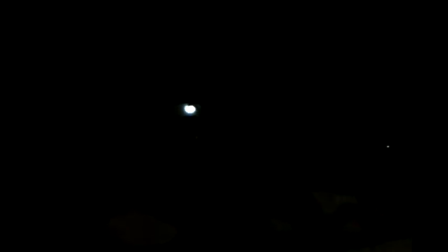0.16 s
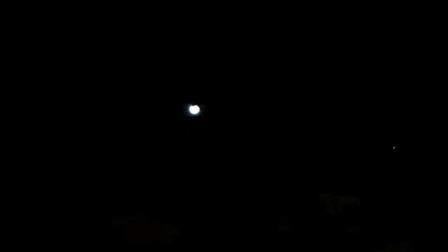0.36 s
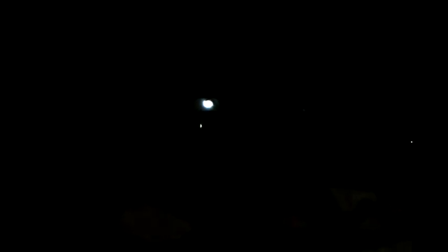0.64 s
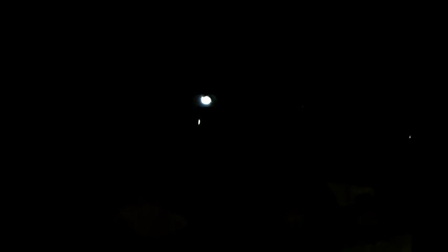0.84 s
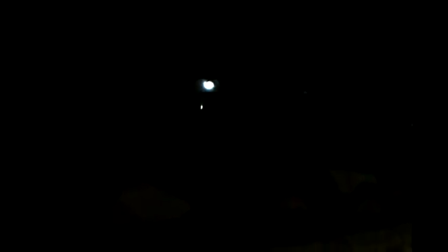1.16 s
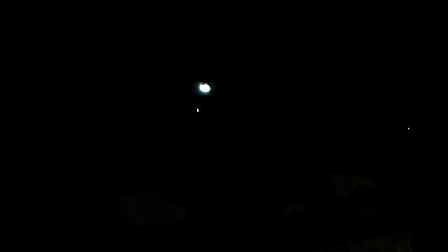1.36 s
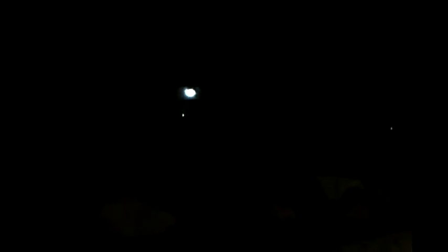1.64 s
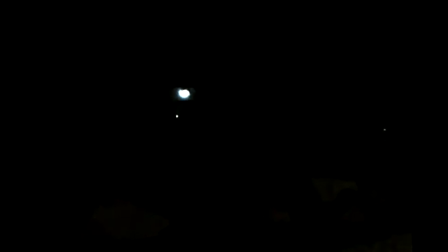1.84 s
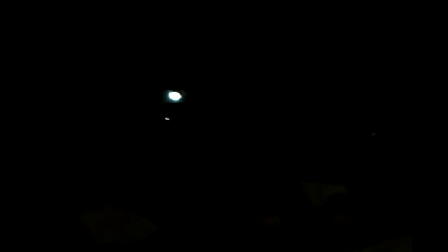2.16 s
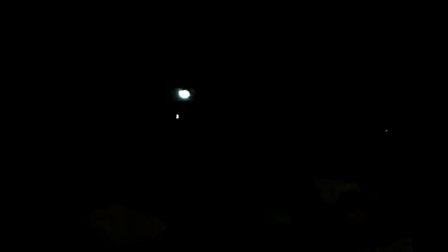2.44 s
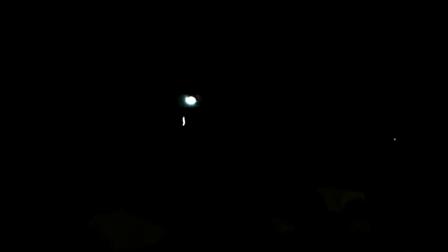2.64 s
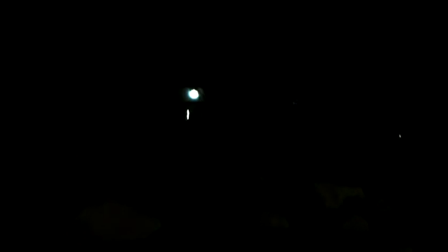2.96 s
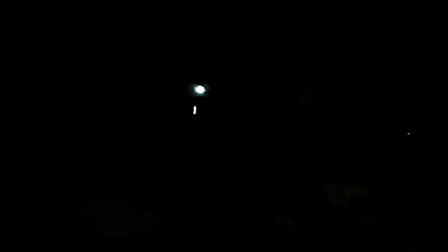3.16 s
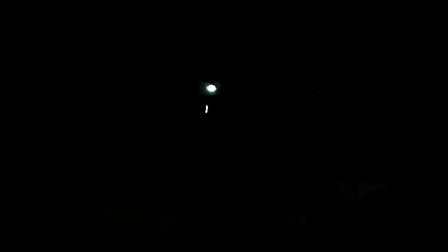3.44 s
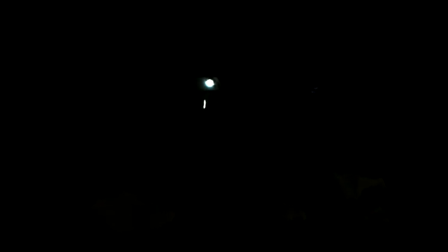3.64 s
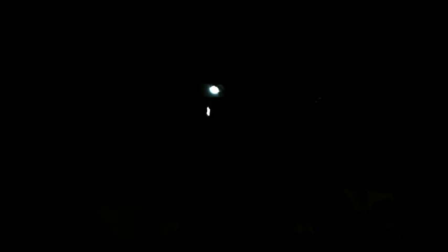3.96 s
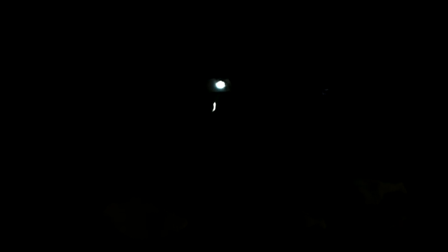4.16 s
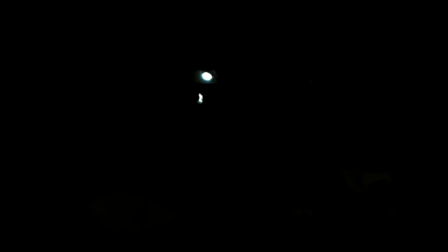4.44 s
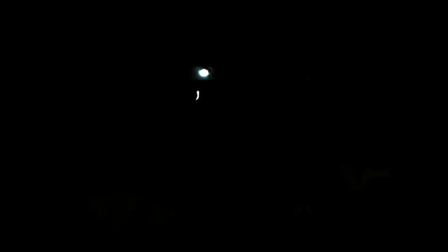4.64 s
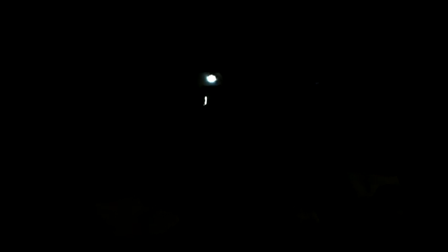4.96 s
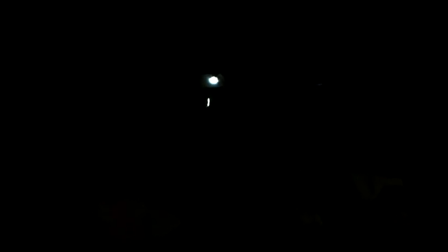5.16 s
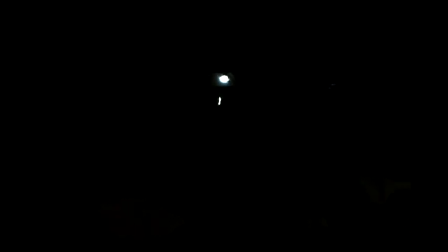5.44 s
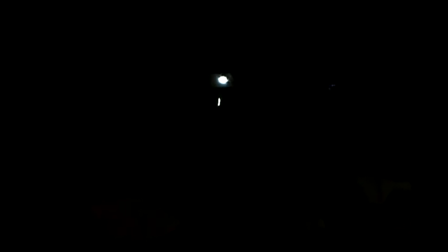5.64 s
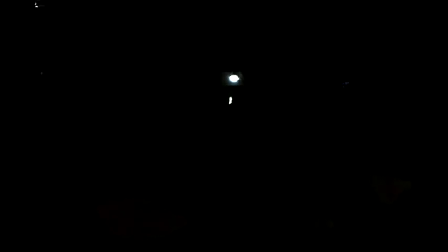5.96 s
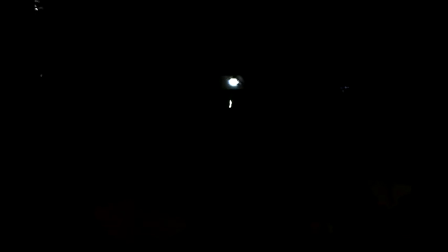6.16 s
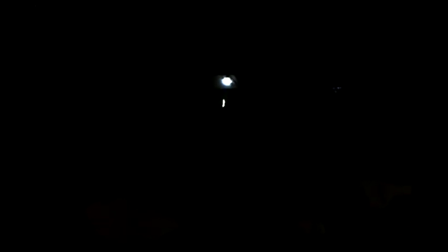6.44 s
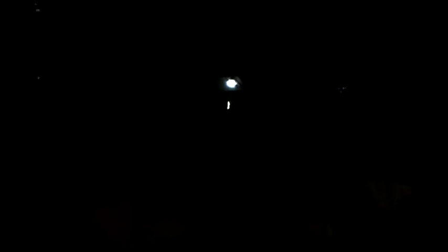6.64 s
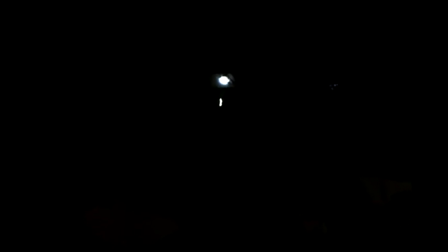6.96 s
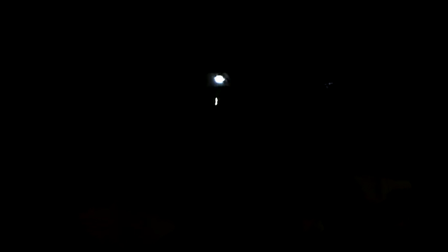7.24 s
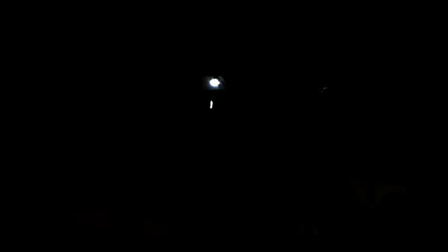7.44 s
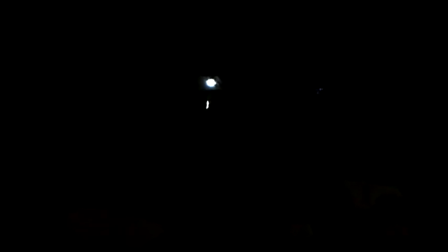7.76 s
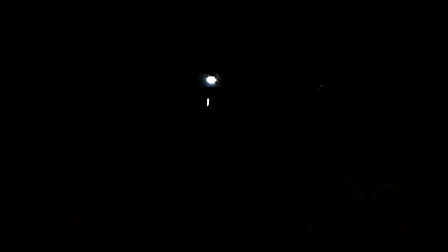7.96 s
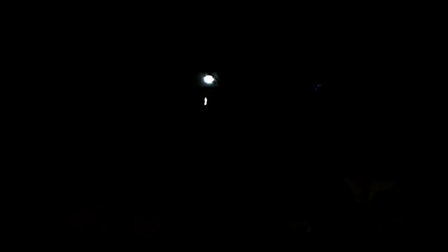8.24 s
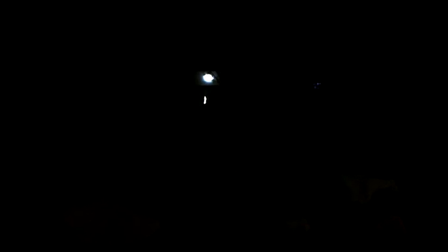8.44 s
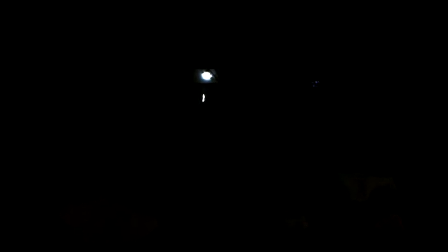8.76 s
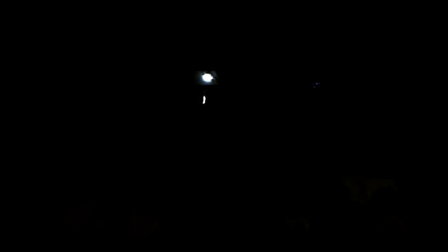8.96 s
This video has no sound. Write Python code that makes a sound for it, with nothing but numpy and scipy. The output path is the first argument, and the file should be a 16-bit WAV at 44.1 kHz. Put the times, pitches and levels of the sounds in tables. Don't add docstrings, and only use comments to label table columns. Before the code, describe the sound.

Beginning on the tail of a raspy croak, a deeper frog answers and the pair keep a brisk alternating rhythm of pulsed double notes around two kilohertz. The small yard adds a short bright echo. Hard, dry clicks of a slipping camera casing, some very loud, and faint sleeve rubs sit right at the microphone. Distant tyre roar slowly rises. The calls stop before the end.

```python
import sys
import numpy as np
from scipy import signal
from scipy.fft import rfft, irfft, next_fast_len
from scipy.io import wavfile
from scipy.ndimage import uniform_filter1d, map_coordinates

SR = 44100
rng = np.random.default_rng(int(sys.argv[2]) if len(sys.argv) > 2 else 0)


def unload_wav(signal):
    wavfile.write(
        sys.argv[1],
        SR,
        np.round(np.clip(np.atleast_2d(signal).T, -1, 1) * 32767).astype(np.int16),
    )


def amplitude_ratio(level_db):
    exponent = np.asarray(level_db, float) / 20
    return 10 ** exponent


N = 401310

# second_note_start_s, second_note_peak_db, first_note_rel_db, second_note_length_s
DEEP_CALLS = [(0.2467, -24, 0.5, 0.053), (0.9602, -19, -4, 0.032), (1.6406, -18, -6, 0.027),
              (2.3246, -20, -2.5, 0.029), (3.0214, -19, -3.5, 0.036), (3.749, -17, -5.5, 0.026),
              (4.4364, -20, -3.5, 0.035), (4.9592, -21, -4, 0.028), (5.5, -17.5, -7.5, 0.03),
              (6.287, -19.5, -4.5, 0.033), (7.3157, -20.5, -5, 0.026)]
# second_note_start_s, second_note_peak_db, first_note_rel_db, second_note_length_s
RASPY_CALLS = [
    (-0.069, -27.5, -7, 0.059),
    (0.6249, -22.5, -4.5, 0.042),
    (1.3121, -23, -3.5, 0.038),
    (2.0028, -20, -4.5, 0.029),
    (2.6924, -19, -4, 0.024),
    (3.4052, -19.5, -5, 0.035),
    (4.0969, -19.5, -4, 0.036),
    (5.9456, -21, -2.3, 0.039),
    (6.6623, -21.5, -2.7, 0.036),
    (7.2393, -20.5, -3.5, 0.041),
]
HURRIED_CUTS = {4.9592: .02, 5.5: .017, 5.9456: .026, 7.2393: .013}
# resonance_hz, width_hz, level_db
DEEP_SAC = [(1001.6, 85, -10), (2015, 90, 4), (2550, 600, -26.5), (3020, 95, -20), (3830, 280, -32.5),
            (4900, 210, -38.5), (6520, 64, -37), (7700, 1300, -43)]
# resonance_hz, width_hz, level_db
RASPY_SAC = [(1080, 170, -13), (1696, 44, -8), (2057, 199, 3.5), (2476, 110, -7), (2610, 280, -18),
             (2868, 180, -8.5), (3840, 130, -21), (4266, 120, -24.5), (6500, 310, -45)]
DEEP_TUNING = (0.8685, 0.962, 0.9765, 1.006)
RASPY_TUNING = (0.969, 1.007, 0.971, 0.997)
# frequency_hz, t60_s
YARD_DECAY = [(800, 1), (2000, 0.47), (4000, 0.5), (7000, 0.38)]
# delay_s, spread_s, level_db
FAR_WALL = (.062, 0.04, -9.5)
# time_s, peak_db
SHELL_TICKS = [(0.4571, -43), (0.524, -37.3), (0.5781, -19.3), (0.8973, -21), (1.2161, -15.2),
               (1.3964, -24.5), (1.6804, -26.8), (1.7625, -43.9), (1.8418, -24.7), (2.3511, -0.1),
               (2.5202, -17.2), (2.55, -16.7), (2.618, -20.1), (2.8117, -16.4), (2.9327, -9.1),
               (3.2784, -21.7), (3.3315, -22.8), (3.4231, -13.4), (3.6579, -28.9), (3.7126, -29.4),
               (3.8583, -21.4), (4.4969, -26.1), (4.8042, -25.9), (4.9749, -19), (5.0115, -40.8),
               (5.3117, -7.7), (5.4546, -12.2), (5.7445, -13.2), (7.3295, -19.5), (7.896, -2.8)]
# time_s, peak_db
SEAM_SLIPS = [
    (0.342, -44.6),
    (0.7684, -31.8),
    (3.0651, -38.6),
    (3.0792, -28.9),
    (3.0915, -29.1),
    (3.103, -28.7),
    (3.1079, -21.8),
    (3.1289, -34.3),
    (4.3716, -16.1),
    (7.5604, -18.5),
]
# start_s, length_s, level_db
SLEEVE_BRUSHES = [(0, 0.021, -89), (0.066, 0.13, -66), (0.196, 0.065, -51.5), (0.306, 0.037, -67),
                  (0.404, 0.075, -62), (0.577, 0.026, -53), (0.602, 0.085, -58), (0.771, 0.039, -52),
                  (0.853, 0.042, -62), (0.89, 0.058, -53), (1.018, 0.1, -68.5), (1.386, .04, -60),
                  (2.54, 0.012, -64.5), (2.619, 0.066, -46.5), (2.805, 0.06, -59.5), (2.924, 0.077, -50),
                  (2.998, 0.084, -59), (3.272, 0.05, -68.5), (4.347, 0.052, -54.5), (4.46, 0.042, -60),
                  (4.825, 0.077, -57), (5.431, 0.079, -64)]
# frequency_hz, level_db_per_hz
CLOTH_SPECTRUM = [(2500, -25.5), (3600, 0.5), (4500, 0), (6000, -3.5), (7000, -2.5)]
# time_s, tyre_roar_db
TRAFFIC_SWELL = [(0, -58.5), (.6, -57.5), (1.2, -56), (1.6, -53), (1.95, -54.5), (2.35, -52.5),
                 (2.9, -50.5), (3.6, -50.5), (4.1, -48.5), (4.45, -46.5), (5.1, -46.5), (5.7, -46),
                 (6.2, -48.5), (6.9, -47.5), (7.25, -48.5), (7.7, -48.5), (9.1, -47)]
# frequency_hz, level_db_per_hz
RUMBLE_SPECTRUM = [(15, -78.5), (25, -50.5), (86, -8.5), (101, -5.5), (120, 1), (199, -2), (243, -1),
                   (339, -8), (539, -14), (600, -11), (780, -38.5), (1320, -120)]
# frequency_hz, level_db_per_hz
TYRE_SPECTRUM = [(210, -20.5), (350, -9), (526, -7), (598, -4), (781, -1), (1280, -2.5), (2010, -12),
                 (2400, -17.5), (3020, -21.5), (6560, -45.5), (7360, -63), (9570, -84), (16200, -120)]
# start_s, length_s, first_hz, last_hz, level_db
ENGINE_NOTES = [(0.083, 0.31, 134.5, 141, -52.5), (0.118, 0.25, 368, 375.5, -59),
                (1.07, .2, 388, 393, -58.5), (1.743, 1.1, 125, 141, -49.5), (1.98, 0.25, 396, 393, -57.5),
                (5.12, 0.82, 119, 131.3, -55.5), (5.45, 0.63, 164, 154.5, -52),
                (5.5, 0.92, 57, 60.4, -65.5), (5.9, 1.0, 121.2, 120.3, -52), (6.803, 1.57, 108.9, 97, -58),
                (7.206, 1.25, 127, 131.2, -52)]

SAC_MAX_HZ = 2200
DEEP_LEAD_S, RASPY_LEAD_S = 0.16, 0.148
TICK_HZ, TICK_HZ_PER_DB = 4550, 12
TREBLE_DB, TREBLE_DB_PER_DB, DULLEST_DB = -6.5, 0.22, -10.5
SLIP_HZ, SLIP_TREBLE_DB = 4620, -3.5
RUMBLE_DB, RUMBLE_FOLLOW_RATIO = -49, 0.38
ENGINE_FADE_S = 0.092
TOP_HZ = 6980


def frog(calls, usual_lead_s, gap_s, sac, tuning, pulse_hz, jitter, swell_db, echo_db, gain_db, taut,
         bright_db, treble_swell):
    track = np.zeros(N + 2 * SR)
    taut_sac = [(hz, width_hz * taut, db + bright_db * (hz > SAC_MAX_HZ)) for hz, width_hz, db in sac]

    def loudness(x, length_s):
        return 3 * np.sqrt(np.mean(x[:round((length_s + 0.01) * SR)] ** 2))

    for s, db, first_db, second_s in calls:
        lead_s = usual_lead_s - sum(cut_s for at_s, cut_s in HURRIED_CUTS.items() if abs(at_s - s) < 0.05)
        first_s = lead_s - gap_s
        pace_hz = pulse_hz * (1 + 0.05 * rng.standard_normal())
        first = throat_pulses(sac, first_s, pace_hz, tuning[:2], swell_db[0], treble_swell, jitter)
        second = throat_pulses(taut_sac, second_s, pace_hz * 0.97, tuning[2:], swell_db[1], 0.35, jitter)
        first = yard(first, *echo_db)
        second = yard(second, *echo_db)
        add(track, s - lead_s, amplitude_ratio(db + first_db + gain_db) * first / loudness(first, first_s))
        add(track, s, amplitude_ratio(db + gain_db) * second / loudness(second, second_s))
    return track[SR:SR + N]


def throat_pulses(sac, length_s, pulse_hz, tuning, swell_db, treble_swell, jitter):
    t = np.arange(SR // 6) / SR
    chance = rng.standard_normal((20, 2 + 2 * len(sac)))
    pulse = np.arange(20)
    start_s = (pulse + jitter * chance[:, 0] * (pulse > 0)) / pulse_hz
    filled = start_s / length_s
    swell = -swell_db * (1 - filled / 0.69) ** 2
    tune = tuning[0] + (tuning[1] - tuning[0]) * filled
    within_note = np.clip(pulse_hz * (length_s - start_s), 0, 1)
    age_s = np.clip(t - start_s[:, None], 0, None)
    x = 0
    for (hz, width_hz, db), detune, scatter in zip(sac, chance[:, 2::2].T, chance[:, 3::2].T):
        share = 1 if hz < SAC_MAX_HZ else treble_swell
        size = amplitude_ratio(db + share * swell + 0.9 * (chance[:, 1] + scatter)) * within_note
        u = 1.5 * np.pi * width_hz * age_s
        envelope = width_hz * u * np.exp(-u)
        pitch_hz = hz * (tune + 0.089 * jitter * detune)[:, None]
        x = x + size @ (envelope * np.sin(2 * np.pi * pitch_hz * age_s))
    return x


def yard(x, wet_db, near_db, wall_db):
    hz, t, z = signal.stft(rng.standard_normal(SR // 2), SR, nperseg=128)
    decay_db = -60 * t / along(YARD_DECAY, hz)[:, None]
    tail = unit(signal.istft(z * amplitude_ratio(decay_db), SR, nperseg=128)[1])
    t = np.arange(len(tail)) / SR
    near = unit(rng.standard_normal(len(t)) * amplitude_ratio(-60 * t / 0.055))
    delay_s, spread_s, far_db = FAR_WALL
    wall = unit(rng.standard_normal(len(t)) * np.exp(-((t - delay_s) / spread_s) ** 2))
    echo = amplitude_ratio(wet_db) * tail + amplitude_ratio(near_db) * near + amplitude_ratio(wall_db + far_db) * wall
    echo /= np.sqrt(len(t))
    echo[0] += 1
    return signal.fftconvolve(x, echo)


def ticks():
    track = np.zeros(N + 2 * SR)
    t = np.arange(-SR // 500, SR // 100) / SR

    def pop(hz, late_s, life_s):
        age_s = t - late_s
        return -np.exp(-(age_s / life_s) ** 2) * np.cos(2 * np.pi * hz * age_s + rng.normal(0, 0.5))

    slips = [(s, db, SLIP_HZ, SLIP_TREBLE_DB) for s, db in SEAM_SLIPS]
    for s, db in SHELL_TICKS:
        treble_db = max(TREBLE_DB + TREBLE_DB_PER_DB * db, DULLEST_DB)
        slips.append((s, db, TICK_HZ + TICK_HZ_PER_DB * db, treble_db))
    for s, db, hz, treble_db in slips:
        tick = pop(hz + 50, 0, 0.00021)
        tick += amplitude_ratio(treble_db - 5.5) * pop(6500, 0.00016, 0.00028)
        tick += amplitude_ratio(-14) * pop(hz, 0.0005, 0.0002)
        buzz = amplitude_ratio(-28 - 60 * abs(t) / 0.011) * rng.standard_normal(len(t))
        peak = abs(signal.hilbert(tick)).max()
        add(track, s + t[0], amplitude_ratio(db + 1.5) * (tick / peak + buzz))
    return filtered(track[SR:SR + N], lambda hz: hz ** 6 / (2500 ** 6 + hz ** 6))


def sleeve():
    t = np.arange(N) / SR
    puffs = 0
    for s, length_s, db in SLEEVE_BRUSHES:
        edge_s = np.minimum(t - s, s + length_s - t)
        puffs = puffs + amplitude_ratio(db) * np.clip(edge_s / 0.013 + 0.5, 0, 1)
    grain = unit(amplitude_ratio(1.8 * wobble(200)) * rush(CLOTH_SPECTRUM, patchy_db=1))
    return (amplitude_ratio(2.0) * puffs + amplitude_ratio(-66)) * grain


def traffic():
    t = np.arange(N) / SR
    time_s, roar_db = np.transpose(TRAFFIC_SWELL)
    tyres_db = np.interp(t, time_s, roar_db)
    rumble_db = RUMBLE_DB + RUMBLE_FOLLOW_RATIO * (tyres_db - tyres_db.mean())
    road = amplitude_ratio(rumble_db + 0.4 * wobble(14.0)) * rush(RUMBLE_SPECTRUM, patchy_db=0.12)
    road += amplitude_ratio(tyres_db - 1.0 + 0.42 * wobble(3.1)) * rush(TYRE_SPECTRUM, patchy_db=-0.5)
    for s, length_s, first_hz, last_hz, db in ENGINE_NOTES:
        hz = np.interp(t, [s, s + length_s], [first_hz, last_hz]) + 0.8 * wobble(8)
        fade = np.clip(np.minimum(t - s, s + length_s - t) / ENGINE_FADE_S, 0, 1)
        tone = np.sin(2 * np.pi * np.cumsum(hz) / SR)
        road += np.sqrt(2) * fade * amplitude_ratio(db + 1.5 * wobble(4)) * tone
    return road


def rush(spectrum, patchy_db):
    z = signal.stft(rng.standard_normal(N + SR), nperseg=512)[2]
    field = uniform_filter1d(rng.standard_normal(z.shape), size=6, axis=0)
    field = uniform_filter1d(field, size=14, axis=1)
    noise = signal.istft(z * amplitude_ratio(patchy_db * unit(field)), nperseg=512)[1][:N]
    return unit(filtered(noise, lambda hz: amplitude_ratio(along(spectrum, hz))))


def wobble(rate_hz):
    knots = rng.standard_normal(int(N * rate_hz / SR) + 4)
    return map_coordinates(knots, [np.arange(N) * rate_hz / SR])


def filtered(x, response):
    m = next_fast_len(N + SR // 2)
    return irfft(rfft(x, m) * response(np.fft.rfftfreq(m, 1 / SR)), m)[..., :N]


def along(points, hz):
    f, v = np.transpose(points)
    return np.interp(np.log(hz + 1), np.log(f + 1), v)


def unit(x):
    return x / np.sqrt(np.mean(x ** 2) + 1e-20)


def add(track, s, x):
    track[round((s + 1) * SR):][:len(x)] += x


def scene():
    deep = frog(DEEP_CALLS, DEEP_LEAD_S, 0.064, DEEP_SAC, DEEP_TUNING, pulse_hz=114, jitter=0.0803,
                swell_db=(18, 5), echo_db=(-3.5, -5.5, -6), gain_db=1.5, taut=0.86,
                bright_db=3.0, treble_swell=0.88)
    raspy = frog(RASPY_CALLS, RASPY_LEAD_S, 0.055, RASPY_SAC, RASPY_TUNING, pulse_hz=142, jitter=0.13,
                 swell_db=(18, 3.5), echo_db=(-2.5, 0, -9), gain_db=0.5, taut=0.96,
                 bright_db=5.0, treble_swell=0.75)
    return (deep + raspy + ticks() + sleeve() + traffic())[None]


def band_limit(x):
    return signal.sosfilt(signal.butter(12, 15800, fs=SR, output="sos"), x)


def record(dry):
    x = filtered(dry, lambda hz: hz ** 4 / (33 ** 4 + hz ** 4) / np.sqrt(1 + (hz / TOP_HZ) ** 60))
    x = np.clip(x, -0.96, 0.98)
    x = x + amplitude_ratio(-94.5) * rng.standard_normal(x.shape)
    return band_limit(x)


dry = scene()
out = record(dry)
unload_wav(out)
```